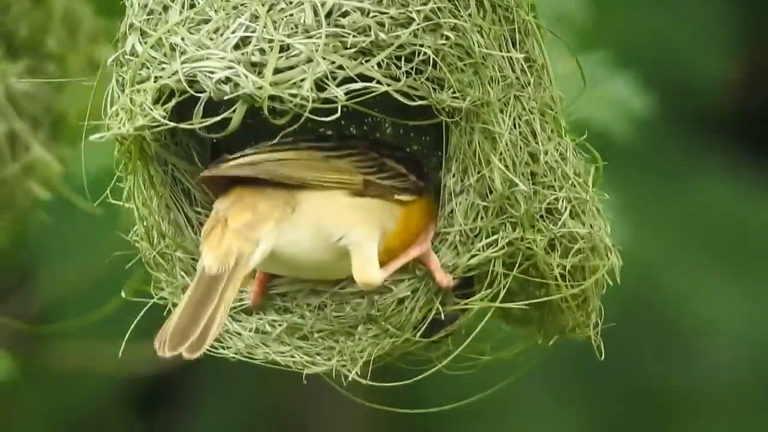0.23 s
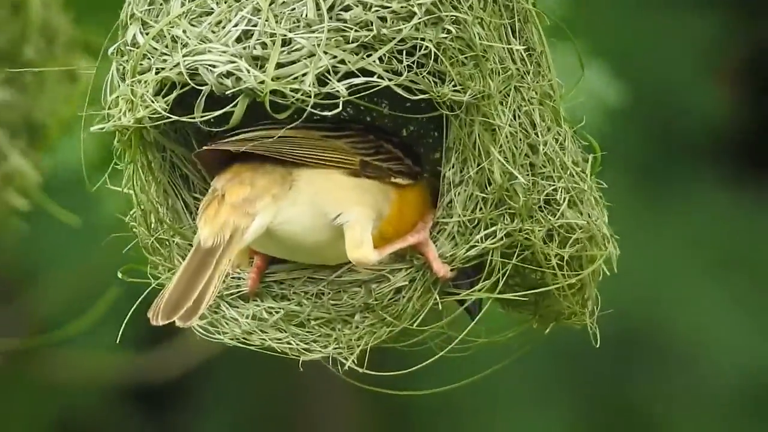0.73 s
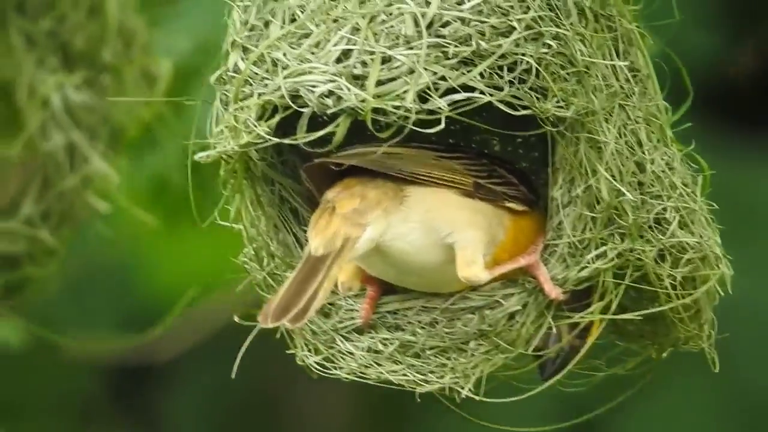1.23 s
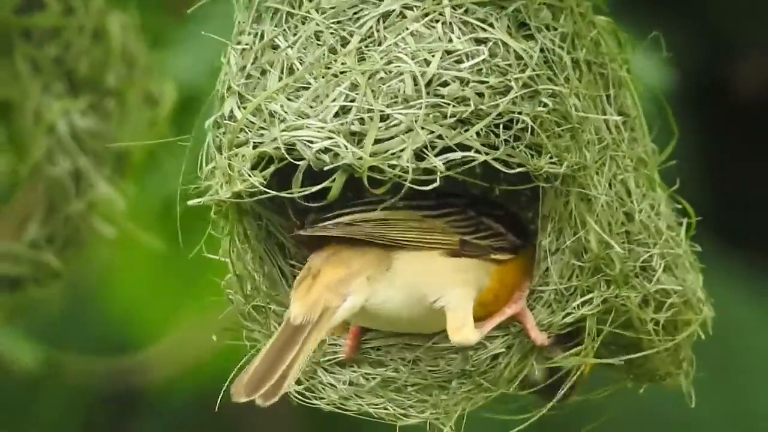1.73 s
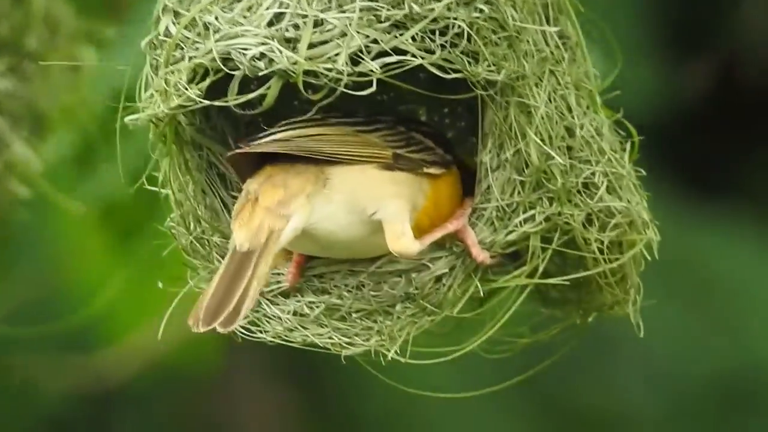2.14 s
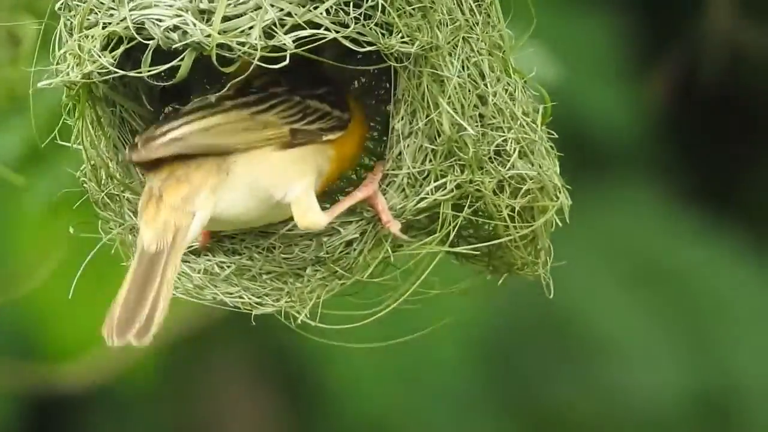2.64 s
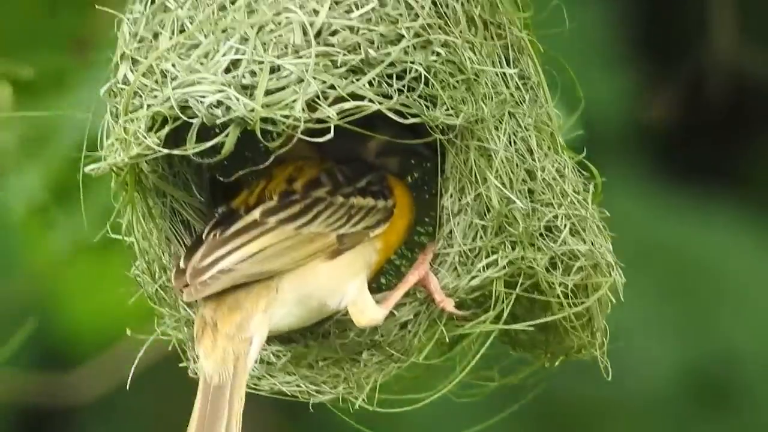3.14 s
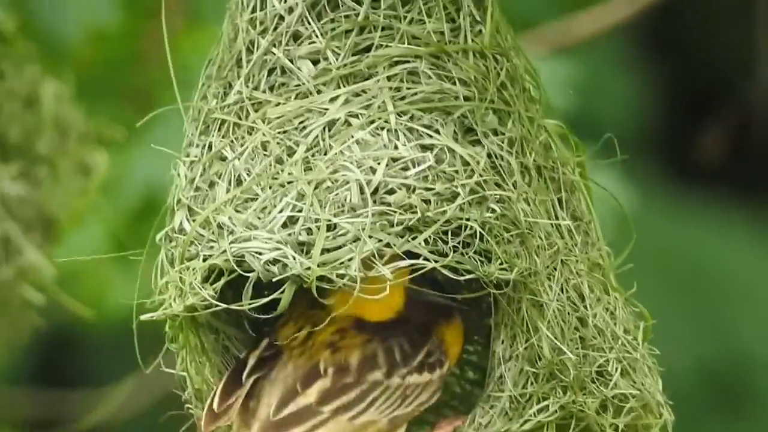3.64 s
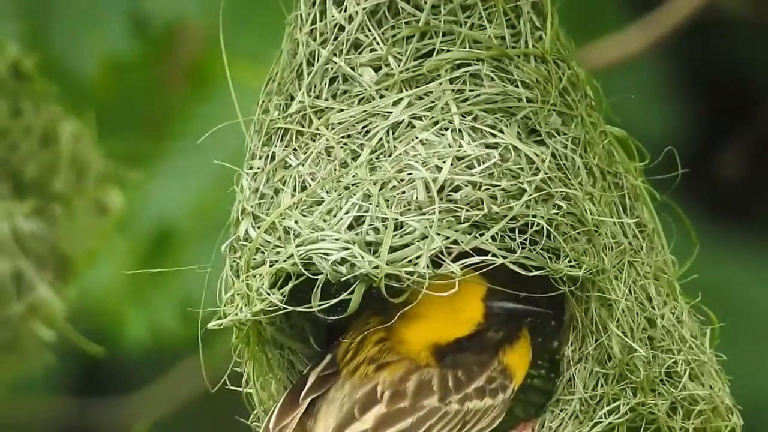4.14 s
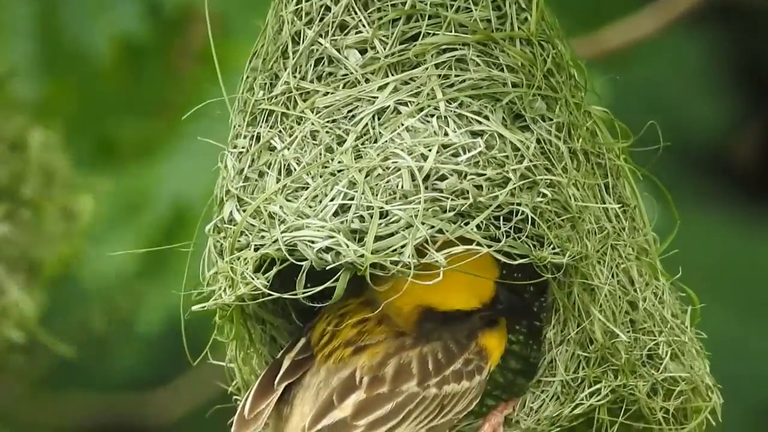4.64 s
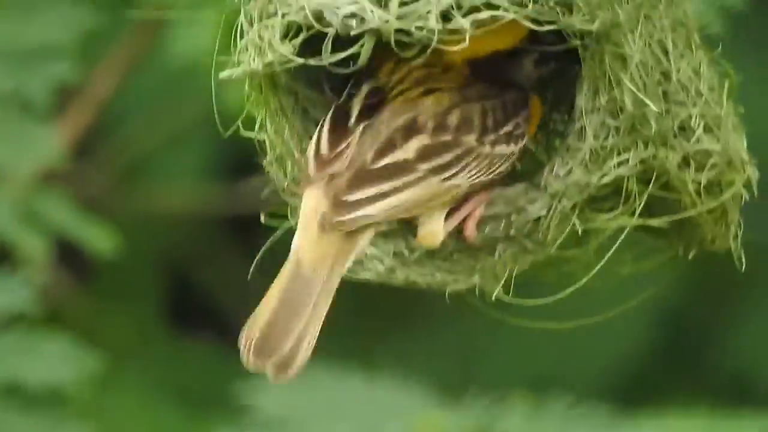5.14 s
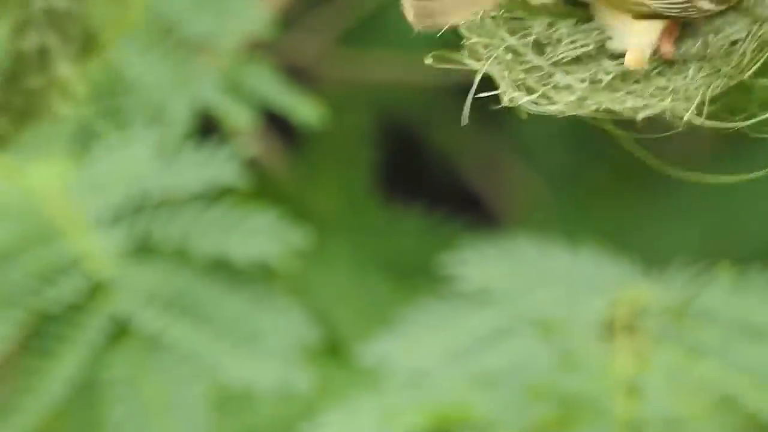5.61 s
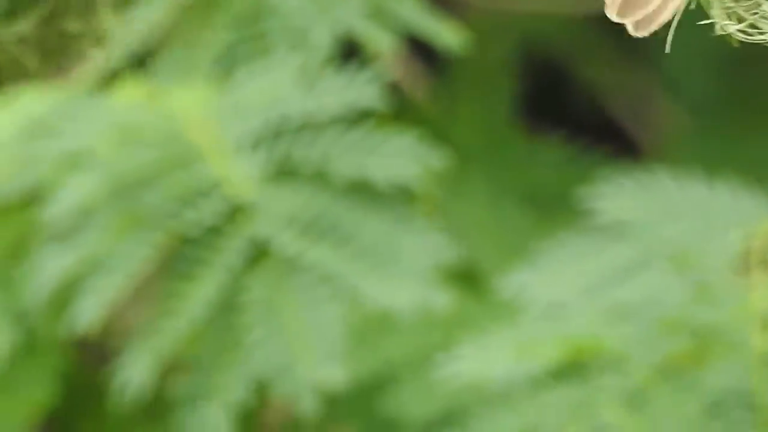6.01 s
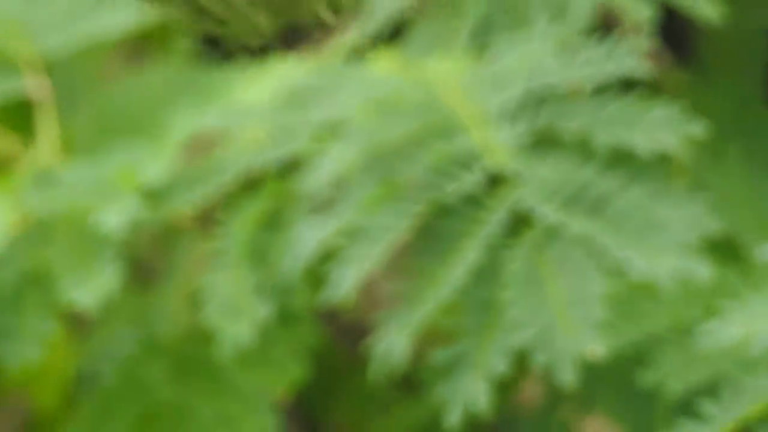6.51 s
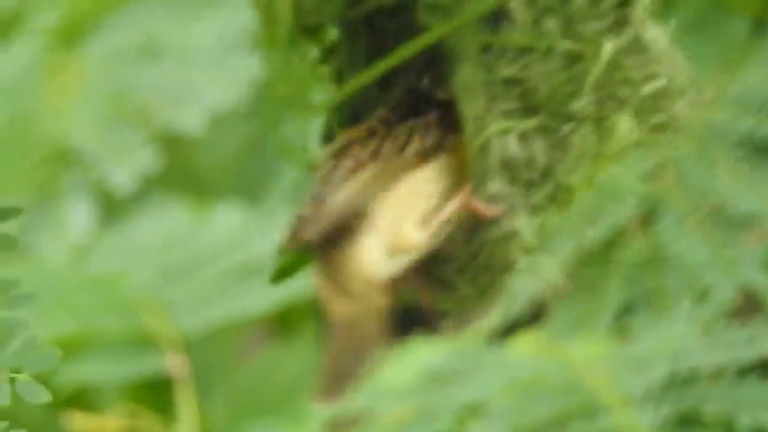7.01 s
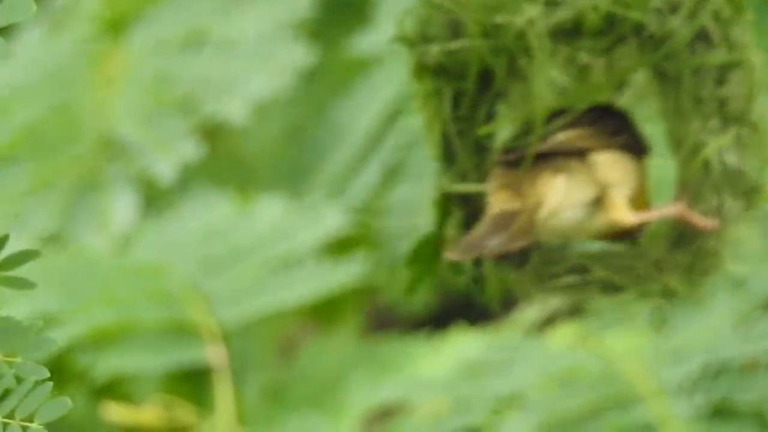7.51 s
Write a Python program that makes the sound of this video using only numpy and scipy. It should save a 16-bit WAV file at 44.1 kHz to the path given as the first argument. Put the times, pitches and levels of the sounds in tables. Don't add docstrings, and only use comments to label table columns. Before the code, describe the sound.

Weaver birds at a woven nest give harsh rapid chits and sliding whistles, with one long buzzy wheeze, over blurred colony chatter and faint hum.

```python
import sys
import numpy as np
from scipy import signal
from scipy.fft import rfft, irfft, next_fast_len
from scipy.io import wavfile
from scipy.ndimage import uniform_filter1d, map_coordinates

SR = 44100
rng = np.random.default_rng(int(sys.argv[2]) if len(sys.argv) > 2 else 0)


def volts_from_decibels(level):
    exponent = np.asarray(level, float) / 20
    return 10 ** exponent


def wav_out(sig):
    wavfile.write(sys.argv[1], SR, np.round(np.clip(np.atleast_2d(sig).T, -1, 1) * 32767).astype(np.int16))


N = 342216
T = np.arange(N) / SR


def unit(x):
    return x / np.sqrt(np.mean(x ** 2) + 1e-20)


def along(points, hz):
    f, v = np.transpose(points)
    return np.interp(np.log(hz + 1), np.log(f + 1), v)


def wobble(rate_hz, size=N):
    knots = rng.standard_normal(int(size / SR * 2000) + 4)
    return map_coordinates(knots, [np.arange(size) * min(rate_hz, 2000) / SR])


def add(track, start_s, sound):
    part = track[max(round(start_s * SR), 0):][:len(sound)]
    part += sound[:len(part)]


def filtered(x, response):
    m = next_fast_len(N + SR // 2)
    return irfft(rfft(x, m) * response(np.fft.rfftfreq(m, 1 / SR)), m)[..., :N]


def rush(spectrum, alike, patchy_db):
    z = signal.stft(rng.standard_normal((2, N)), nperseg=256)[2]
    field = uniform_filter1d(rng.standard_normal(z.shape[1:]), size=3, axis=0)
    field = uniform_filter1d(field, size=10, axis=1)
    pair = signal.istft(z * volts_from_decibels(patchy_db * unit(field)), nperseg=256)[1][:, :N]

    def mid_side(hz):
        turn = np.arccos(np.clip(along(alike, hz), -1, 1)) / 2
        return volts_from_decibels(along(spectrum, hz)) * [np.cos(turn), np.sin(turn)]

    mid, side = filtered(pair, mid_side)
    return unit(np.array([mid + side, mid - side]))


# (time [s], peak level [dB])
GUSTS = [(.1, -65), (.38, -61), (1.75, -64), (2.2, -68), (2.62, -60), (2.98, -55), (3.271, -53),
         (3.52, -50), (3.921, -54), (4.28, -53), (4.8, -58), (5.2, -51), (5.5, -57.5), (5.8, -58),
         (6.6, -78), (7.3, -65)]
# (frequency [Hz], density [dB/Hz])
BUFFET = [(12, -62), (32, -20), (65, 18), (118, -7), (195, 8), (300, -37), (390, -3), (660, -120)]


def wind():
    gust_s, lull_db, lumpy_db = 0.11, -64, 2.5
    gusts = volts_from_decibels(lull_db) + sum(volts_from_decibels(db) * np.exp(-((T - s) / gust_s) ** 2) for s, db in GUSTS)
    lumps = np.array([wobble(3.9), wobble(8.1)])
    return gusts * volts_from_decibels(7.0 + lumpy_db * lumps) * rush(BUFFET, [(70, 0.044), (220, 0.14)], patchy_db=-0.5)


# (time [s], level [dB])
TOWN_DB = [(0, -39.5), (2.4, -38.5), (3.2, -40), (4.4, -39.5), (4.86, -38.5), (5.62, -42), (6.53, -44),
           (7.3, -44.5), (7.76, -45.5)]
# (frequency [Hz], density [dB/Hz])
HUM = [(59, -11), (100, -2.5), (135, -9.5), (195, -2), (417, -5), (614, -3.5), (756, -9), (918, -5),
       (1060, -7), (2310, -12.5), (3500, -8), (4550, -50), (7700, -120)]
# (frequency [Hz], correlation [0-1])
ALIKE = [(60, 0.37), (130, 1), (240, 0.97), (480, 0.97), (950, 0.96), (1890, 0.86), (3770, 0.79),
         (7520, 0.32), (15000, 0.06)]


def town():
    hum_db = np.interp(T, *np.transpose(TOWN_DB))
    return volts_from_decibels(hum_db + .5 * wobble(6)) * rush(HUM, ALIKE, patchy_db=2.0)


# (time [s], level [dB])
CHATTER_DB = [(0, -38), (1.6, -38.5), (2.44, -41.5), (2.66, -36.5), (3.87, -38), (4.86, -35), (5.62, -37.5),
              (7.3, -41), (7.76, -45.5)]
# (frequency [Hz], density [dB/Hz])
COLONY = [(1290, -19), (2200, -48), (2510, -28), (2720, -41), (3940, -5.5), (4210, -2), (5840, 0.5),
          (6340, 5.5), (8310, -11), (11900, -30), (15600, -41)]


def colony():
    chatter_db = np.interp(T, *np.transpose(CHATTER_DB))
    return volts_from_decibels(chatter_db + 2.5 + 1.1 * wobble(7)) * rush(COLONY, ALIKE, patchy_db=1.2)


# (frequency [Hz], t60 [s])
LEAVES = [(2500, 0.18), (5000, 0.25), (10000, 0.017)]


def foliage(x):
    hop, out = SR // 8, np.zeros((2, N + SR))
    for start in range(0, N, hop):
        hz, t, z = signal.stft(rng.standard_normal((3, SR // 3)), SR, nperseg=128)
        decay = (1 - 0.5 * np.exp(-t / 0.066)) * volts_from_decibels(-60 * t / along(LEAVES, hz)[:, None])
        tail = signal.istft(z * decay, SR, nperseg=128)[1]
        tail = tail[:2] + 1.77 * tail[2]
        piece = x[start:start + 2 * hop]
        piece = piece * np.hanning(2 * hop)[:len(piece)]
        wet = signal.fftconvolve(piece[None], tail / np.linalg.norm(tail[0]), axes=1)
        out[:, start + 150:][:, :wet.shape[1]] += wet
    return out[:, :N]


def tone(hz, rough, partials):
    size = len(hz)
    phase = 2 * np.pi * np.cumsum(hz + 300 * rough ** 2 * wobble(500, size)) / SR
    voices = (volts_from_decibels(db) * np.sin(k * phase + k) * (1 + rough * wobble(220.5, size)) for k, db in partials)
    return sum(voices) * np.sqrt(2)


def phrase(rows, rough, partials, of):
    s, hz, db = np.transpose(rows)
    t = np.arange(s[0], s[-1], 1 / SR)
    fade = np.clip(np.minimum(t - s[0], s[-1] - t) / 0.002, 0, 1)
    return fade * volts_from_decibels(np.interp(t, s, db)) * tone(np.interp(t, s, hz) / of, rough, partials)


def glide(start_s, length_s, from_hz, to_hz, db, rough):
    u = np.linspace(0, 1, round(length_s * SR))
    hz = from_hz + (to_hz - from_hz) * u ** 1.2
    return start_s, volts_from_decibels(db) * np.sin(np.pi * u) ** .5 * tone(hz, rough, [(1, 3.5), (2, -33)])


# (time [s], high note time [s], low pitch of 4th harmonic [Hz], low level [dB], high level [dB])
PIPING = [
    (6.055, 6.116, 2716, -32.5, -38),
    (6.231, 6.311, 2610, -34.5, -33),
    (6.473, 6.587, 2688, -35.5, -31.5),
    (6.927, 7.015, 2660, -39.5, -28.5),
    (7.3, 7.426, 2577, -34.5, -30.5),
]
PIPE_TONE_DB = [-12.5, -120, -10.5, -4, -8, -7, -11, -7]


def piper():
    scoop, leap = 1.09, 1.14
    dip_s, jump_s, trail_s = 0.0308, 0.0168, 0.03
    entry_db, held_db, trail_db = -3, -2.5, -15.5
    out = np.zeros(N)
    for s, high_s, low_hz, db, high_db in PIPING:
        rows = [(s, scoop * low_hz, db + entry_db),
                (s + dip_s, low_hz, db),
                (high_s - jump_s, low_hz, db + held_db),
                (high_s, leap * low_hz, high_db),
                (high_s + trail_s, leap * low_hz, high_db + trail_db)]
        add(out, s, volts_from_decibels(-1.5) * phrase(rows, .2, [(1, 0)], of=1))
        add(out, s, volts_from_decibels(-1.5) * phrase(rows[:-2], .26, enumerate(PIPE_TONE_DB, 3), of=4))
    return out


# (time [s], level [dB rms], pulse rate [1/s])
WHEEZE = [
    (2.44, -33, 900),
    (2.55, -23.5, 790),
    (2.737, -26.5, 770),
    (2.9, -25.5, 800),
    (3.19, -23.5, 830),
    (3.44, -24, 800),
    (3.54, -27.5, 780),
    (3.599, -43, 740),
]
# (frequency [Hz], width [Hz], level [dB])
BEAK = [(3670, 120, -10.5), (4370, 92, -2), (4830, 370, -11.5), (5630, 360, 0), (6800, 640, -13)]


def wheeze():
    s, db, rate = np.transpose(WHEEZE)
    cycles = np.cumsum(np.interp(T, s, rate) * (1 + 0.08 * wobble(300))) / SR
    pulses = unit((np.diff(np.floor(cycles), prepend=0) > 0) * volts_from_decibels(0.85 * rng.standard_normal(N)))
    drive = (pulses + 0.42 * rng.standard_normal(N)) * volts_from_decibels(1.3 * wobble(140))

    def beak(f):
        rings = sum((-1) ** k * volts_from_decibels(g) * 1j * f * w / (c * c - f * f + 1j * f * w)
                    for k, (c, w, g) in enumerate(BEAK))
        return rings / (1 + (3300 / (f + 1)) ** 8) / (1 + (f / 6900) ** 14)

    buzz = unit(filtered(drive, beak))
    octave = unit(filtered(buzz ** 2, lambda f: np.exp(-((f - 11300) / 900) ** 2)))
    return volts_from_decibels(np.interp(T, s, db, -120, -120)) * (buzz + volts_from_decibels(-38) * octave)


# (time [s], pitch [Hz], level [dB rms])
WHISTLE = [
    (1.998, 3655, -52),
    (2.041, 3340, -27.5),
    (2.068, 3333, -33),
    (2.16, 3255, -27.5),
    (2.234, 3600, -28),
    (2.283, 3565, -24.5),
    (2.352, 3446, -26.5),
    (2.358, 3550, -27),
    (2.41, 3600, -60),
]


def whistle():
    out = np.zeros(N)
    add(out, WHISTLE[0][0], phrase(WHISTLE, .25, [(1, 0), (2, -28), (3, -42)], of=1))
    add(out, WHISTLE[0][0], volts_from_decibels(-7) * phrase(WHISTLE, .35, [(1, 0)], of=.958))
    return out


# (time [s], from [Hz], to [Hz], level [dB rms])
SLIDES = [(.026, 7900, 7000, -36), (1.122, 6480, 4860, -26.5), (1.287, 4820, 3010, -35),
          (1.473, 4820, 2774, -29.5), (1.545, 3080, 3430, -37), (3.548, 3730, 2880, -35),
          (3.698, 4595, 2790, -35.5), (3.994, 4340, 2930, -39.5), (4.318, 3940, 3130, -44),
          (4.445, 3600, 2950, -39), (4.598, 4040, 3200, -42.5), (5.735, 4400, 3720, -43),
          (5.765, 4000, 3220, -39), (6.345, 4340, 4070, -38), (6.362, 4100, 3180, -40)]
# (time [s], from [Hz], to [Hz], level [dB rms])
FLICKS = [(.026, 4800, 3700, -34), (.041, 3700, 2350, -39), (.578, 3100, 1900, -44), (.76, 3100, 2000, -44),
          (.834, 3400, 6400, -40), (.936, 3100, 1900, -45), (1.114, 5500, 6350, -33),
          (1.122, 3300, 2300, -44), (1.177, 4740, 2670, -36), (1.434, 3800, 2500, -37),
          (1.668, 3640, 2700, -37), (1.83, 4800, 4100, -30), (1.866, 3650, 2650, -30),
          (2.428, 3880, 2560, -32), (4.7, 3600, 2600, -37), (4.874, 6270, 4200, -28),
          (5.012, 3500, 2500, -36), (6.47, 4500, 6100, -40), (7.282, 2270, 5950, -45)]
# (time [s], length [s], pitch [Hz], level [dB rms])
NOTES = [(.019, 0.01, 5400, -28), (.031, 0.016, 3750, -30), (.361, 0.022, 3497, -34),
         (.362, .015, 7200, -39), (.77, .027, 3480, -35.5), (1.333, 0.032, 4410, -33.5),
         (1.382, .04, 6400, -34), (1.624, 0.061, 4500, -28.5), (1.65, 0.019, 3760, -32),
         (1.71, 0.029, 3490, -44), (1.727, 0.029, 6820, -34), (1.78, .012, 3800, -31),
         (1.855, 0.011, 3690, -21.5), (2.001, 0.019, 3700, -28), (3.7, 0.023, 4490, -34),
         (4.688, 0.018, 3620, -31.5), (4.998, .015, 3730, -41)]
# (time [s], length [s], pitch [Hz], level [dB rms])
PEEPS = [(.778, .02, 6850, -39), (1.405, .042, 5580, -31), (1.405, .03, 6000, -35), (1.64, .05, 4520, -34),
         (1.745, .05, 7200, -40), (1.895, .01, 3650, -38), (4.292, .03, 4150, -44),
         (4.575, .025, 4180, -44), (4.58, .24, 142, -52), (5.21, .072, 394, -46), (7.49, .024, 2795, -45)]
# (time [s], length [s], pitch [Hz], level [dB rms])
RASPS = [
    (1.055, 0.053, 5700, -48),
    (1.125, 0.15, 5900, -32),
    (1.69, 0.185, 4644, -36),
    (2, .02, 4600, -39),
    (1.9, 0.079, 2500, -54),
    (3.004, .025, 6850, -32),
    (4.0, 0.066, 4300, -47),
    (4.735, .025, 6700, -36),
    (5.425, 0.046, 6900, -30),
    (6.88, 0.034, 6600, -28),
]


def song():
    out = np.zeros(N)
    for rows, oct_per_s, rough in [(SLIDES, 11.2, .4), (FLICKS, 30, .28)]:
        for s, from_hz, to_hz, db in rows:
            length_s = abs(np.log2(to_hz / from_hz)) / oct_per_s
            add(out, *glide(s, length_s, from_hz, to_hz, db, rough))
    for rows, sag_oct_per_s, rough in [(NOTES, 3, .3), (PEEPS, 0, .15), (RASPS, 0.73, 1.1)]:
        for s, length_s, hz, db in rows:
            add(out, *glide(s, length_s, hz, hz * 2 ** (-sag_oct_per_s * length_s), db, rough))
    pip_lead_s, pip_s, pip_hz, pip_end_hz = 0.012, 0.013, 2200, 2000
    for s, *_ in CHURRS[:4]:
        add(out, *glide(s - pip_lead_s, pip_s, pip_hz, pip_end_hz, -43, rough=.1))
        add(out, *glide(s - pip_lead_s, pip_s, 2 * pip_hz, 2 * pip_end_hz, -46, rough=.2))
    return out + whistle()


def chits(calls, start_hz, throat, order, period_s, fall_per_s, swell_s, last_s, entry_db, tilt_db,
          boost_db, width_hz, rough, gain_db):
    lead_dull_db, lead_fade_db_per_s = -4, -600
    uneven_db = 2.2
    out, t, k = np.zeros(N), np.arange(SR // 36) / SR, np.arange(1, 7)[:, None]
    for s, db, throat_hz, length_s, *lead_db in calls:
        luck = rng.standard_normal((10, 4))
        for n, (late, bend, size, gape) in enumerate(luck):
            loose = min(n, 3) / 3
            hz = k * start_hz * (1 + .055 * bend * loose) * np.exp(-fall_per_s * t)
            hz = hz * (1 + 0.026 * rough * (.5 + loose) * wobble(882, size=t.size))
            flare = np.exp(-((hz - throat_hz - 350 * gape * loose) / width_hz) ** 2)
            colour = along(throat, hz) + boost_db * (1.45 - .85 * loose) * flare
            colour = colour + tilt_db * np.maximum(k - order, 0)
            grit = np.tanh(wobble(538.0, size=k.size * t.size)).reshape(k.size, -1)
            rasp = 1 + rough * (0.74 + 0.25 * loose) * k / order * grit
            opening = np.clip((swell_s - t) / .003 + .5, 0, 1)
            lead = sum(lead_db) + lead_fade_db_per_s * (t - .005)
            effort = opening * (entry_db if n else lead)
            colour = colour + (n == 0) * opening * lead_dull_db * (k >= order)
            phase = 2 * np.pi * np.cumsum(hz, axis=1) / SR + k * size
            sweep = (volts_from_decibels(colour) * rasp * np.sin(phase)).sum(axis=0)
            attack_s = .004 if lead_db and not n else .0015
            shape = np.clip(t / attack_s, 0, 1) * np.clip((last_s - t) / 0.012, 0, 1)
            level = uneven_db * size * loose - 55 * n * period_s - 90 * max(n * period_s / length_s - .9, 0)
            start_s = s - swell_s + n * period_s + .001 * late * loose
            add(out, start_s, volts_from_decibels(db + level + effort + gain_db) * shape * sweep)
    return out


# (time of first loud sweep [s], peak level [dB], throat [Hz], length [s])
CHURRS = [(0.502, -22, 4550, 0.075), (0.681, -18, 4300, 0.065), (0.857, -15, 4440, 0.064),
          (1.039, -15.5, 4260, 0.061), (1.341, -28, 4160, 0.13), (1.429, -17, 3300, 0.049),
          (1.701, -24.5, 4120, 0.065), (1.778, -22, 4370, 0.12), (3.738, -28.5, 4410, 0.093),
          (4.036, -24.5, 3830, 0.089), (4.453, -30, 4930, 0.08), (4.999, -25, 3280, 0.1)]
# (frequency [Hz], level [dB])
LOW_THROAT = [(1060, -61), (1800, -44), (2660, -8), (3400, -1.5), (3850, -8), (4310, -2), (4870, -10),
              (5400, -6.5), (5970, -15), (12000, -44.5), (15600, -74), (22000, -120)]


def churrs():
    return chits(CHURRS, 2300, LOW_THROAT, order=2, period_s=0.01, fall_per_s=25, swell_s=0.0025,
                 last_s=0.022, entry_db=-2.0, tilt_db=1.0, boost_db=4.5, width_hz=280, rough=0.33,
                 gain_db=-3.5)


# (time of first loud sweep [s], peak level [dB], throat [Hz], length [s], lead-in [dB])
SCOLDS = [
    (1.2438, -17.5, 6800, .05, 8),
    (1.4098, -14.5, 5160, 0.078, -12),
    (1.7527, -17.5, 5630, 0.031, -4),
    (1.8, -19.5, 4860, 0.052, -5),
    (2.1287, -28.5, 5000, .055, 0),
]
# (frequency [Hz], level [dB])
NEAR_THROAT = [(1060, -59), (1800, -22.5), (2020, -29), (2900, -11.5), (3570, -5), (5450, -2.5),
               (5970, 0.5), (6890, -2.5), (7890, -16.5), (15500, -45)]


def scolds():
    return chits(SCOLDS, 3300, NEAR_THROAT, order=2, period_s=0.0059, fall_per_s=22, swell_s=.006,
                 last_s=0.029, entry_db=-6, tilt_db=-0.5, boost_db=8.5, width_hz=890, rough=0.86,
                 gain_db=-15.5)


# (time of first loud sweep [s], peak level [dB], throat [Hz], length [s], lead-in [dB])
TWITTER = [
    (.0481, -3, 5600, 0.062, -7),
    (.3792, -7.5, 5680, 0.048, -2),
    (.7952, -10.5, 5400, 0.082, -11),
    (1.2032, -9.5, 5400, 0.032, -2.5),
    (1.4569, -9.5, 5800, 0.081, -14),
]
# (frequency [Hz], level [dB])
THIN_THROAT = [(1060, -61), (1800, -28), (2740, -25.5), (3380, -10.5), (3890, -14), (4330, -19),
               (4900, -15.5), (5640, -8.5), (6380, -3), (13000, -23)]


def twitter():
    return chits(TWITTER, 3540, THIN_THROAT, order=2, period_s=0.015, fall_per_s=33, swell_s=.007,
                 last_s=0.023, entry_db=-2.5, tilt_db=-14, boost_db=7.5, width_hz=400, rough=0.59,
                 gain_db=-6)


# (time of first loud sweep [s], peak level [dB], throat [Hz], length [s], lead-in [dB])
CHITS = [(2.417, -14, 4740, 0.052, -10), (2.59, -11.5, 4900, 0.042, -8), (2.7684, -9.5, 4940, 0.073, -9),
         (2.975, -7, 4860, 0.038, -20), (4.7034, -9, 5550, 0.069, -6), (4.8913, -7, 5000, 0.055, -12),
         (5.047, -4, 5450, 0.04, -3), (5.227, -6.5, 5220, 0.047, -3), (5.7867, -8.5, 5340, 0.042, -12),
         (5.9723, -6, 5650, 0.06, -5), (6.1898, -8, 5720, 0.068, -2.5), (6.6508, -6.5, 5130, 0.066, -10),
         (6.8404, -7.5, 5380, 0.054, 2), (7.0544, -9.5, 5000, 0.042, -8)]
ANSWERS = [
    (5.408, -7.5, 5150, 0.045, -8),
    (5.5927, -7.5, 5120, 0.051, -12),
]


def near_chits():
    return sum(chits(calls, start_hz, NEAR_THROAT, order=3, period_s=0.012, fall_per_s=30, swell_s=.0125,
                     last_s=0.022, entry_db=-4, tilt_db=0.5, boost_db=8, width_hz=600, rough=0.815,
                     gain_db=-9.5)
               for calls, start_hz in [(CHITS, 2770), (ANSWERS, 2485)])


def scene():
    wet_db, song_wet = -5, .7
    singer = song()
    birds = near_chits() + scolds() + twitter() + churrs() + singer + wheeze() + piper()
    right = 0.8 * np.pad(birds, (1, 0))[:-1] + 0.11 * birds
    direct = np.array([birds, right]) * volts_from_decibels([[.2], [-.2]])
    scattered = volts_from_decibels(wet_db) * foliage(birds - (1 - song_wet) * singer)
    return direct + scattered + wind() + town() + colony()


def band_limit(x):
    return signal.sosfilt(signal.butter(12, 15770, fs=SR, output="sos"), x)


def record(dry):
    band = filtered(dry, lambda hz: hz < 15770)
    return band_limit(band)


dry = scene()
out = record(dry)
wav_out(out)
```